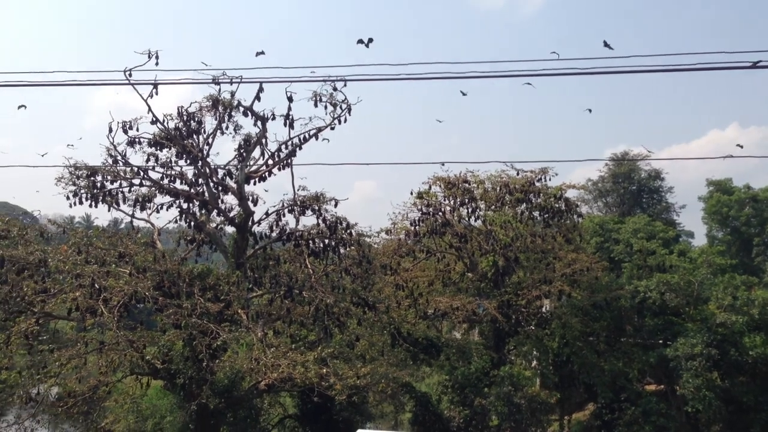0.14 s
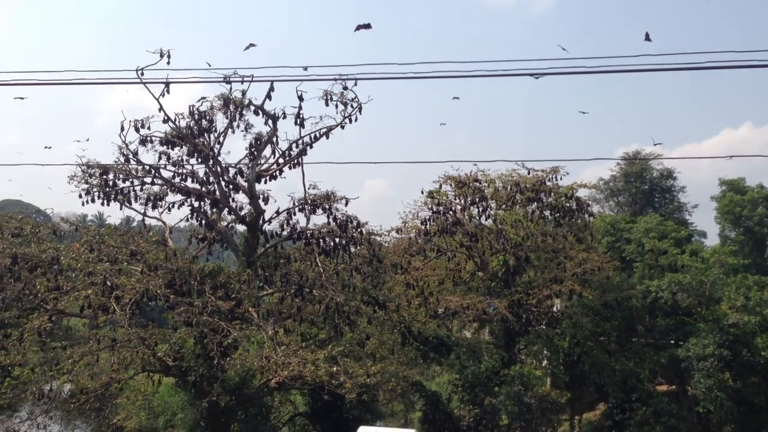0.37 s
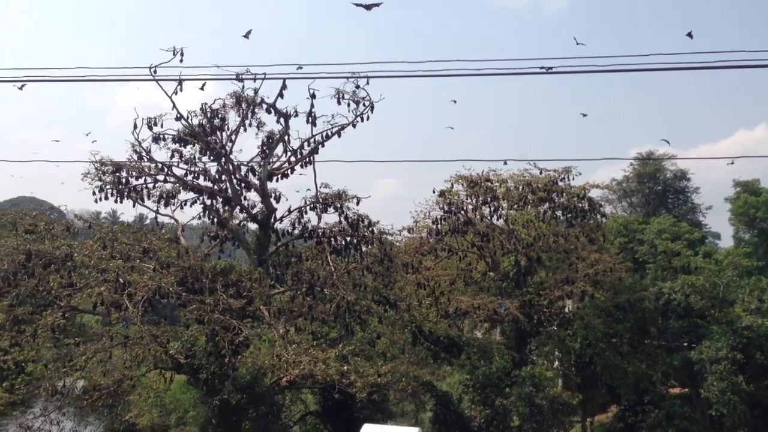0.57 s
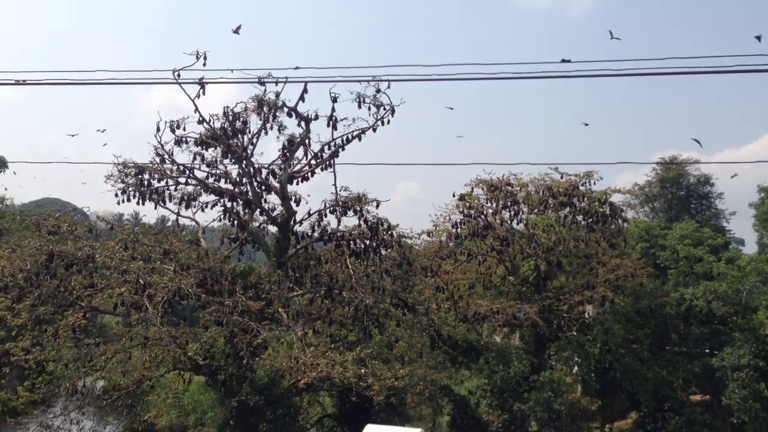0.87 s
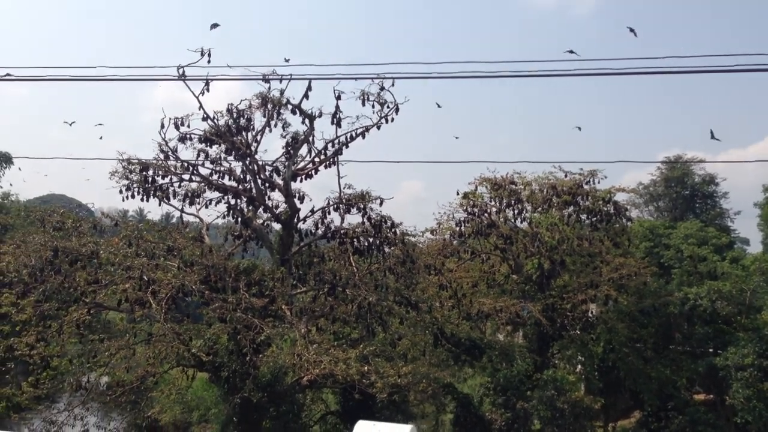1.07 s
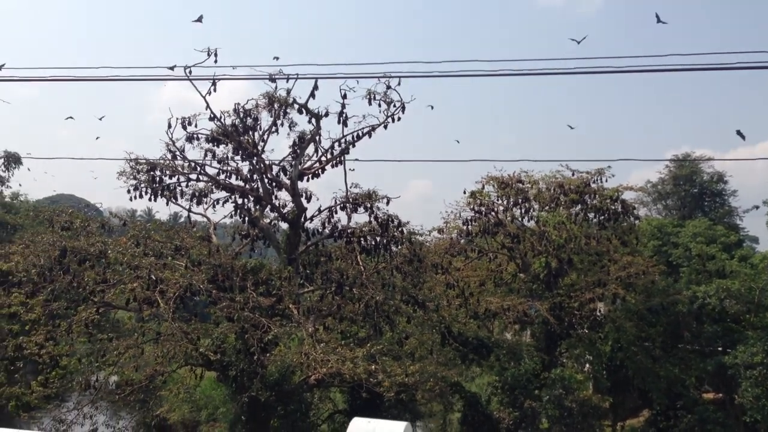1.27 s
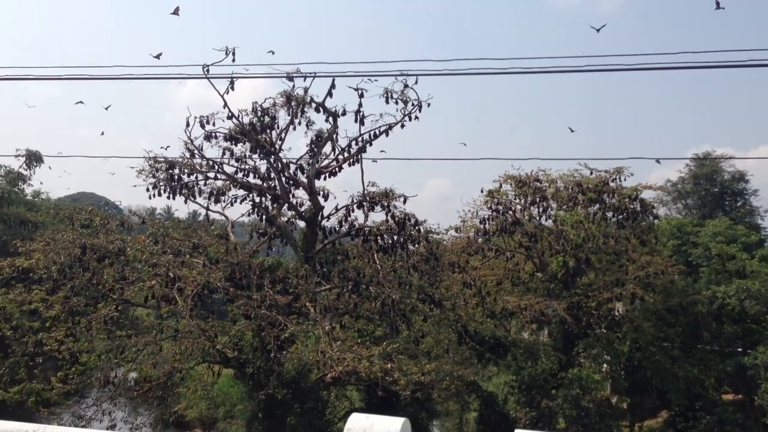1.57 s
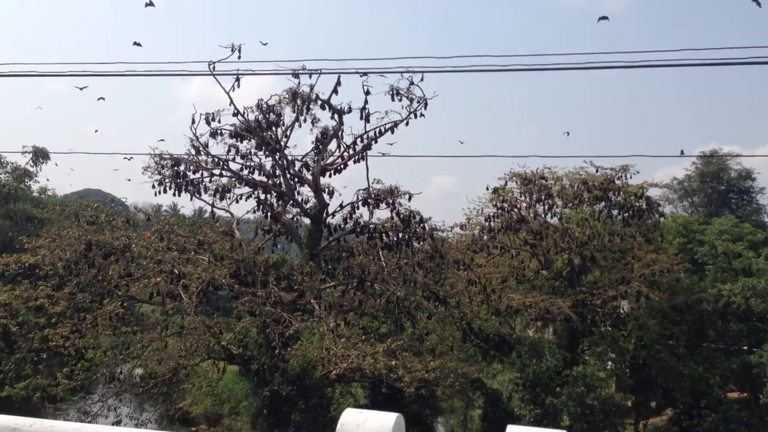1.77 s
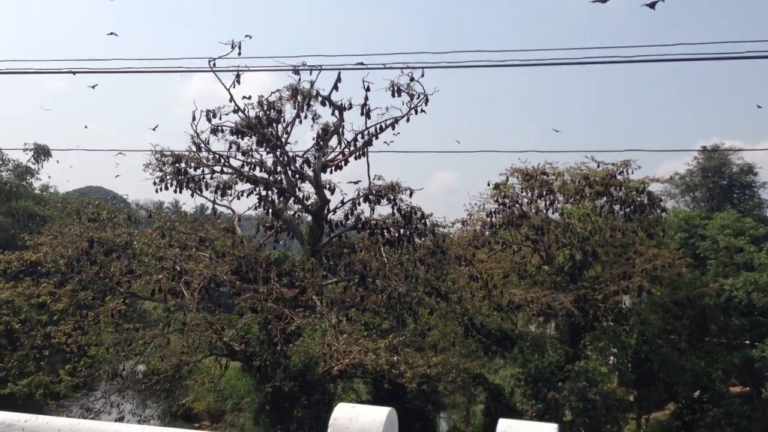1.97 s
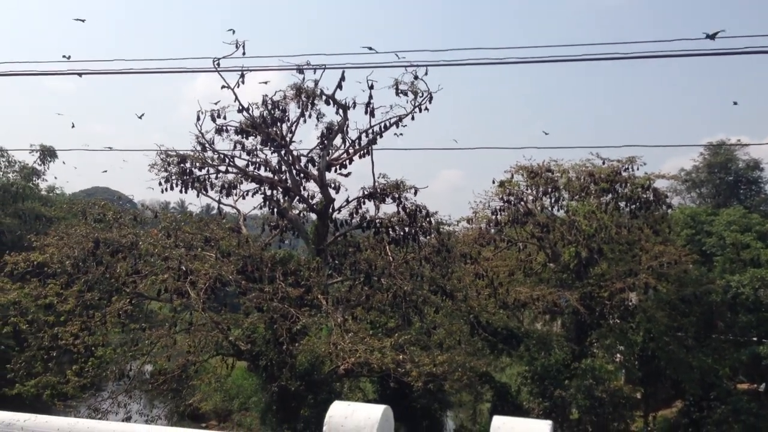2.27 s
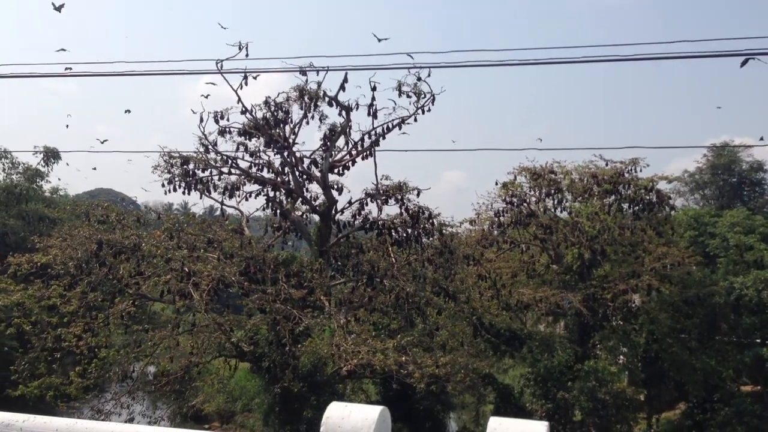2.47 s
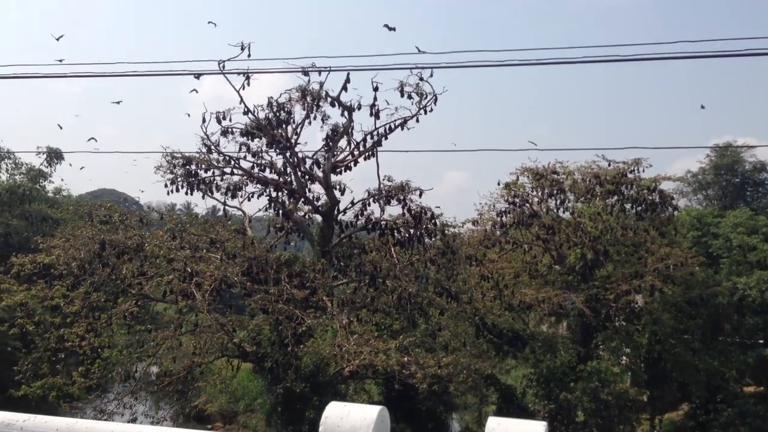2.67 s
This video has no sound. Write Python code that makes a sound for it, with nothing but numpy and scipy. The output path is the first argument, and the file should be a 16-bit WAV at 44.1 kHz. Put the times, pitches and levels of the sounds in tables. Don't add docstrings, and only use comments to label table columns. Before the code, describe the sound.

A big colony of fruit bats squeals and screeches nonstop in a tree, over low traffic rumble

```python
import sys
import numpy as np
from scipy import signal
from scipy.fft import rfft, irfft, next_fast_len
from scipy.io import wavfile
from scipy.ndimage import uniform_filter1d, map_coordinates

SR = 44100
rng = np.random.default_rng(int(sys.argv[2]) if len(sys.argv) > 2 else 0)


def nominal_scale(level):
    x = np.asarray(level, float) / 20
    return 10 ** x


def output_pcm(signal):
    pcm = np.clip(np.atleast_2d(signal).T, -1, 1) * 32767
    wavfile.write(sys.argv[1], SR, np.round(pcm).astype(np.int16))


N = 125244

# start [t/s], length [t/s], pitch [f/Hz], level [level/dB], brightness [dB per octave]
SCREECHES = [(0.384, 0.25, 967, -53, 1.5), (.62, .22, 900, -59.5, 7), (0.867, .21, 796, -46.5, 4),
             (1.059, 0.19, 932, -49, 8.5), (1.245, 0.23, 900, -48, 6.5), (1.675, 0.169, 916, -46, 4.5),
             (1.84, .205, 892, -52.5, 7.5), (2.168, .14, 900, -42, -.7), (2.317, .11, 900, -47.5, 2),
             (2.514, 0.185, 839, -47.5, -1), (2.788, 0.048, 840, -43, -4.1)]


def near_screeches():
    track = np.zeros(N + SR)
    for start, *call in SCREECHES:
        add(track, start, screech(*call))
    return track[:N]


# frequency [f/Hz], gain [level/dB]
SCREECH_THROAT = [(1200, -40), (2600, 3.5), (4700, 4.5), (6000, 0.5), (8000, -2.5), (10500, -10.5),
                  (12500, -14.5), (15000, -23.5)]


def screech(length, pitch_hz, db, bright_db):
    progress, shape = effort(length)
    arch = 0.34 * length * 4 * progress * (1 - progress)
    unsteady = 0.0087 * wobble(198.0, len(progress))
    cycles = np.cumsum(pitch_hz * (1 + arch + unsteady)) / SR
    pulses = sum(np.cos(2 * np.pi * k * cycles) for k in range(1, 18))
    hiss = (1 + 0.16 * np.cos(2 * np.pi * cycles)) * rng.standard_normal(len(progress))

    def throat(hz):
        tilt_db = bright_db * np.log2(hz / 5000 + 0.01)
        return nominal_scale(along(SCREECH_THROAT, hz) + tilt_db)

    voice = filtered(0.6 * unit(pulses) + unit(hiss), throat)
    return nominal_scale(db + 0.95 * wobble(27, len(progress))) * shape * unit(voice)


# short, gliding syllables, with a
# loud squabble from 2.1 s
SQUEALS = [(.02, 0.028, 6500, 6500, -53), (.09, .09, 5050, 5100, -56), (.115, 0.042, 4250, 4750, -50),
           (0.173, .075, 3940, 4550, -48.5), (.19, 0.064, 2450, 2800, -51), (0.254, 0.049, 2700, 2700, -50),
           (.345, 0.052, 2720, 2675, -47.5), (.41, .115, 2680, 2640, -47), (0.394, .04, 4100, 4000, -47),
           (.405, .025, 7800, 7800, -58), (.44, .03, 4400, 4800, -49), (0.462, .035, 4830, 4880, -46.5),
           (.49, .085, 4900, 5200, -49), (.47, .025, 9650, 9650, -59), (.58, .1, 9050, 9250, -63),
           (0.568, .03, 4880, 4820, -48), (.55, .11, 4145, 4300, -51), (0.694, .035, 4200, 4350, -50),
           (0.861, 0.041, 2404, 2420, -47.5), (.925, .035, 7900, 7800, -56),
           (0.948, .075, 4900, 5100, -49.5), (1.031, .055, 6150, 6400, -51), (1.09, .05, 8800, 9000, -57),
           (1.109, .045, 6050, 6150, -50), (1.165, .03, 6140, 6050, -49), (1.185, .035, 2720, 2760, -50),
           (1.266, .045, 4550, 4450, -49), (1.269, .15, 5850, 5950, -53), (1.317, .04, 2750, 2720, -44.5),
           (1.361, 0.038, 2950, 2900, -47), (1.405, 0.085, 2754, 2750, -47.5),
           (1.394, .025, 4620, 4600, -45.5), (1.446, .03, 3420, 3400, -48), (1.53, .05, 4950, 4800, -52),
           (1.62, .04, 3380, 3350, -44),
           (1.69, .065, 2720, 2660, -46), (1.77, .03, 2740, 2770, -47), (1.82, 0.028, 2780, 2700, -45),
         (1.886, 0.042, 2820, 2780, -45.5), (1.985, .045, 2660, 2660, -46), (2.04, .025, 2780, 2800, -45),
         (1.74, .04, 4980, 5200, -50), (1.79, 0.062, 4900, 4750, -45), (1.875, 0.033, 4620, 4600, -46),
         (1.975, 0.028, 4720, 4700, -44), (1.5, .05, 4900, 4950, -51), (1.93, .05, 2740, 2680, -54),
         (1.84, .04, 4650, 4700, -49), (1.9, .07, 5000, 4900, -49), (2.01, 0.102, 4800, 4650, -51),
         (1.95, .08, 7350, 7550, -59), (1.88, .15, 11000, 9700, -63),
           (2.165, .085, 2700, 2680, -42.5), (2.26, .045, 2400, 2720, -49), (2.19, 0.03, 3200, 3650, -48),
            (2.22, .065, 3600, 3620, -41), (2.29, .035, 3900, 3450, -49), (2.185, 0.038, 5050, 4950, -47),
            (2.23, .075, 4600, 4000, -47), (2.165, .04, 5950, 5850, -50), (2.17, 0.059, 6600, 7300, -56),
            (2.31, 0.079, 2720, 2760, -47), (2.39, .055, 2720, 2850, -49), (2.6, .065, 4800, 4800, -51),
            (2.345, .03, 4020, 4000, -46.5), (2.34, 0.08, 3550, 3620, -49), (2.2, 0.042, 1900, 1880, -48),
            (2.49, .075, 4850, 5150, -47), (2.555, 0.074, 3290, 3420, -46),
            (2.63, 0.087, 3450, 3150, -44.5), (2.11, .03, 2020, 2020, -52), (2.59, 0.038, 4500, 3700, -45),
            (2.585, 0.033, 5200, 5150, -47), (2.63, 0.067, 4950, 4850, -51),
            (2.685, 0.034, 4200, 4480, -45), (2.57, .1, 5400, 5900, -54), (3.1, .035, 3520, 3480, -45.5)]
LOW_SQUEALS = [
    (0.656, 0.19, 1397, 1302, -57),
    (1.121, .05, 1900, 1800, -54),
    (1.33, .03, 1820, 1810, -48),
    (1.405, .03, 1840, 1866, -46.5),
    (1.76, 0.038, 1840, 1825, -48),
    (1.815, 0.027, 1884, 1855, -50),
]


def near_squeals():
    track = np.zeros(N + SR)
    for start, *call in SQUEALS + LOW_SQUEALS:
        add(track, start, squeal(*call, jitter_hz=50, flutter_db=0.8))
    return track[:N]


def squeal(length, from_hz, to_hz, db, jitter_hz, flutter_db):
    usual_pitch_hz, neighbour_db = 900, -14.5
    arch_per_s, rasp = 0.1, 0.38
    progress, shape = effort(length)
    size = len(progress)
    favoured = max(round((from_hz + to_hz) / 2 / usual_pitch_hz), 1)
    glide_hz = from_hz + (to_hz - from_hz) * progress
    line_hz = glide_hz * (1 + arch_per_s * length * (4 * progress * (1 - progress) - 2 / 3))
    cycles = np.cumsum((line_hz + jitter_hz * wobble(302.0, size)) / favoured) / SR
    stack = np.zeros(size)
    for k in range(-2, 3):
        if favoured + k > 1 or k == 0:
            stack += nominal_scale(neighbour_db * abs(k)) * np.sin(2 * np.pi * (favoured + k) * cycles)
    rough = stack * (1 + rasp * wobble(159.58, size))
    return nominal_scale(db + flutter_db * wobble(28.4, size)) * shape * unit(rough)


def effort(length):
    attack_s, release_s = 0.0091, 0.025
    t = np.arange(int(0.3 * SR)) / SR
    rise = np.clip(t / attack_s, 0, 1)
    fall = np.clip((length - t) / release_s + 0.5, 0, 1)
    return np.clip(t / length, 0, 1), rise * fall


CHORUS_THROAT_HZ = [1550, 1950, 2700, 3598, 4486, 5000, 7060]
# frequency [f/Hz], gain [level/dB]
CHORUS_COLOUR = [(1000, -20.5), (1250, -2.5), (2150, -3), (2700, 4.5), (4800, 1.5), (5600, -18), (9000, -2),
                 (15000, -26.5)]


def crowd(count=150):
    lead = SR // 2
    track = np.zeros(N + 2 * SR)
    for k, (when, long, high, glide, loud) in enumerate(rng.random((count, 5))):
        line_hz = CHORUS_THROAT_HZ[k % 7] * (0.93 + 0.14 * high)
        end_hz = line_hz * (0.92 + 0.18 * glide)
        call = squeal(0.0576 + 0.15 * long, line_hz, end_hz, 3 * loud, jitter_hz=69.8, flutter_db=1.0)
        add(track, (k + 3 * when) / count * (N + lead) / SR, call)
    coloured = filtered(track, lambda hz: nominal_scale(along(CHORUS_COLOUR, hz)))
    return nominal_scale(-48) * unit(coloured[lead:lead + N])


# frequency [f/Hz], gain [level/dB]
BLUR = [(700, -14.5), (1100, -8), (1300, 2), (4200, 1), (5200, -0.5), (8000, -12), (12000, -22),
        (15500, -30.5)]


def blur():
    return nominal_scale(-40.5) * rush(BLUR, patchy_db=1.34)


# time [t/s], gain [level/dB]
CHORUS_LEVEL = [(0, 0.041), (.7, 0), (1.5, 0), (2.1, 0), (2.45, 0.012), (2.84, 0.0083)]


def chorus():
    return nominal_scale(curve(CHORUS_LEVEL)) * (crowd() + blur())


# frequency [f/Hz], density [level/dB per Hz]
RUMBLE = [(18, -56), (30, -45), (70, -20), (150, -4.5), (178, -0.5), (210, -1.5), (377, -11), (439, -10),
          (1100, -19), (1430, -19.5), (2420, -120)]
# time [t/s], level [level/dB]
TRAFFIC = [(0, -42.5), (.38, -43.5), (.5, -42.5), (.56, -45.5), (.68, -43.5), (1.2, -43.5), (1.66, -44.5),
           (1.85, -43.5), (2.17, -41.5), (2.24, -43), (2.6, -43.5), (2.75, -41.5), (2.84, -43)]


def traffic():
    level_db = curve(TRAFFIC) + 1.0 * wobble(7.93, N)
    return nominal_scale(level_db) * rush(RUMBLE, patchy_db=0.52)


# frequency [f/Hz], time to fall by 60 dB [t/s]
FOLIAGE = [(500, 0.1), (4000, 0.085), (12000, 0.28)]


def foliage(x):
    hz, t, z = signal.stft(rng.standard_normal(SR // 2), SR, nperseg=256)
    decay_db = -60 * t / along(FOLIAGE, hz)[:, None]
    tail = signal.istft(z * nominal_scale(decay_db), SR, nperseg=256)[1]
    return signal.fftconvolve(x, tail / np.linalg.norm(tail))[:N]


def unit(x):
    return x / np.sqrt(np.mean(x ** 2) + 1e-20)


def along(points, hz):
    f, v = np.transpose(points)
    return np.interp(np.log(hz + 1), np.log(f + 1), v)


def curve(rows):
    return np.interp(np.arange(N) / SR, *np.transpose(rows))


def wobble(rate, size):
    knots = rng.standard_normal(128)
    return map_coordinates(knots, [np.arange(size) * rate / SR], mode="mirror")


def filtered(x, response):
    m = next_fast_len(len(x) + 2048)
    return irfft(rfft(x, m) * response(np.fft.rfftfreq(m, 1 / SR)), m)[:len(x)]


def rush(spectrum, patchy_db):
    z = signal.stft(rng.standard_normal(N + 512), nperseg=512)[2]
    field = uniform_filter1d(rng.standard_normal(z.shape), 4, 0)
    field = uniform_filter1d(field, 12, 1)
    noise = signal.istft(z * nominal_scale(patchy_db * unit(field)), nperseg=512)[1][:N]
    return unit(filtered(noise, lambda hz: nominal_scale(along(spectrum, hz))))


def add(track, start, sound):
    at = int(max(start, 0) * SR)
    track[at:at + len(sound)] += sound


def scene():
    near = near_screeches() + near_squeals()
    far = chorus()
    bats = near + nominal_scale(-14.5) * foliage(near) + 0.81 * far + nominal_scale(-10) * foliage(far)
    mono = bats + traffic()
    return np.array([mono, mono])


# centre [t/s], low edge [f/Hz], high edge [f/Hz], level [level/dB]
SPLIT_BANDS = [
    (.705, 6250, 7640, -62),
    (1.1, 6880, 8400, -57.5),
    (1.1, 8950, 10450, -63.5),
    (1.52, 4600, 5750, -54),
    (2.47, 9800, 11100, -70.5),
]


def side_noise():
    t = np.arange(N) / SR
    side = np.zeros(N)
    for centre, low_hz, high_hz, db in SPLIT_BANDS:
        band = filtered(rng.standard_normal(N), lambda hz: (hz > low_hz) & (hz < high_hz))
        fade = np.cos(np.pi * np.clip((t - centre) / 0.046, -0.5, 0.5))
        side += nominal_scale(db) * fade * unit(band)
    return side


def band_limit(x):
    return signal.sosfilt(signal.butter(12, 15300, fs=SR, output="sos"), x)


def record(dry):
    side = side_noise()
    mix = dry + np.array([side, -side])
    return band_limit(mix)


dry = scene()
out = record(dry)
output_pcm(out)
```